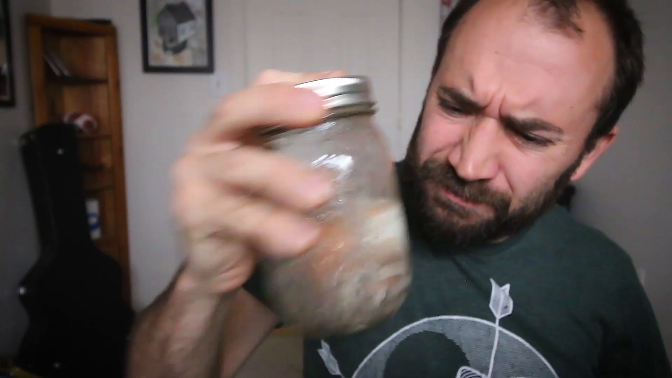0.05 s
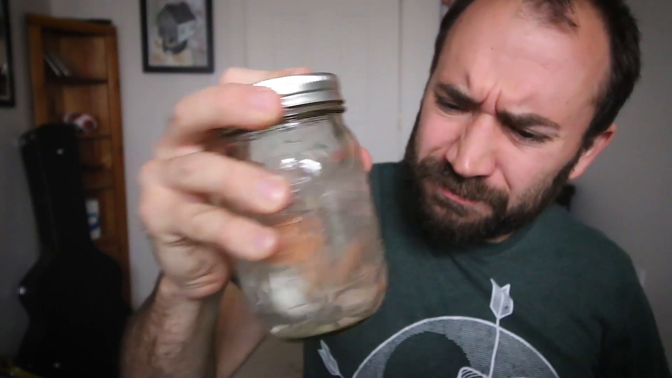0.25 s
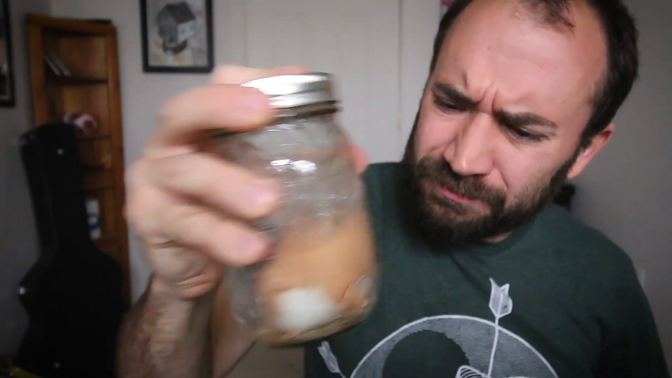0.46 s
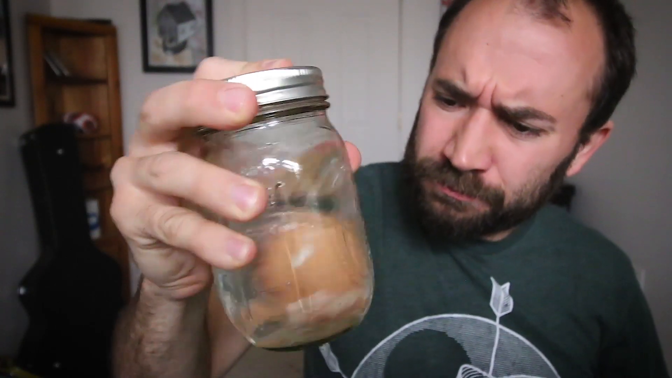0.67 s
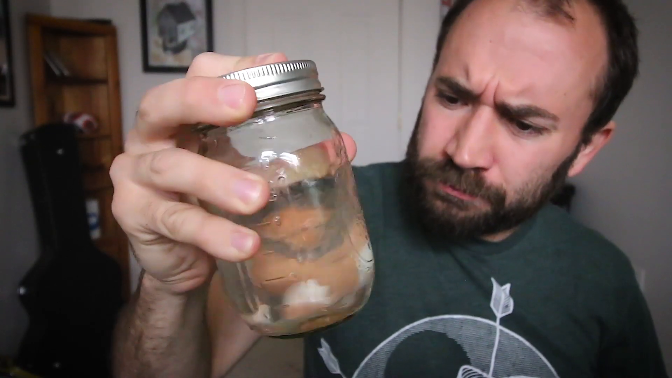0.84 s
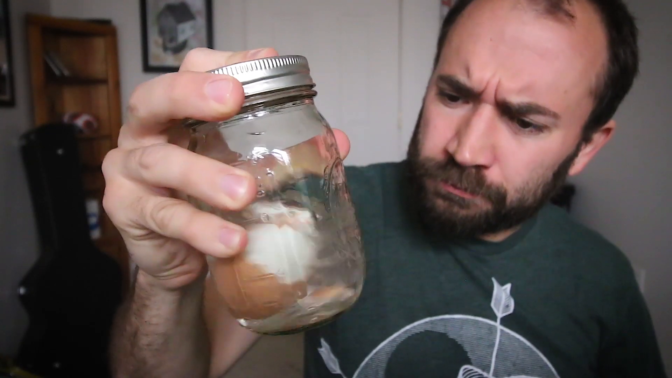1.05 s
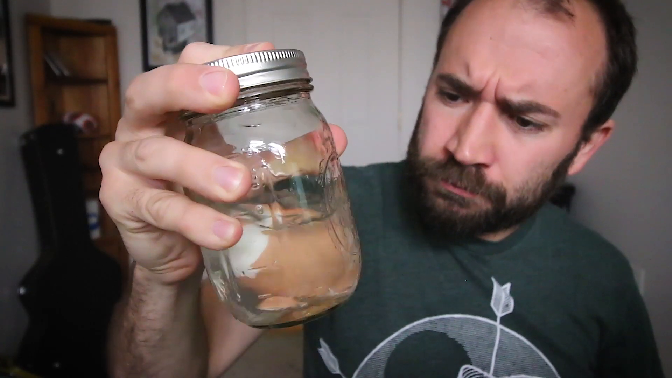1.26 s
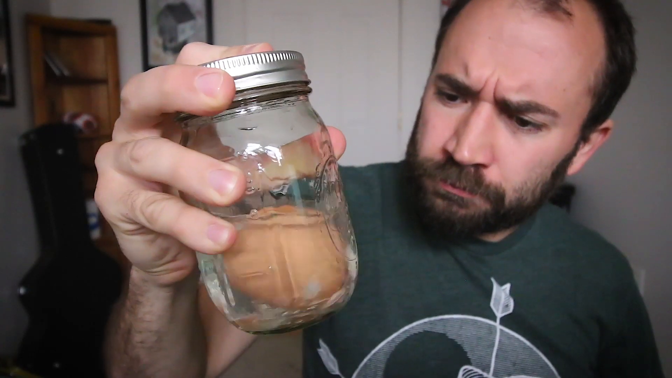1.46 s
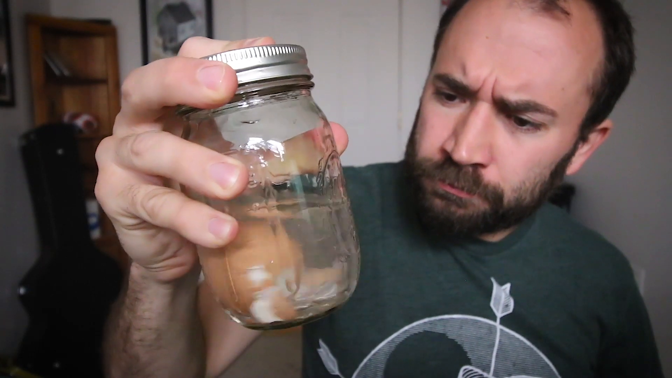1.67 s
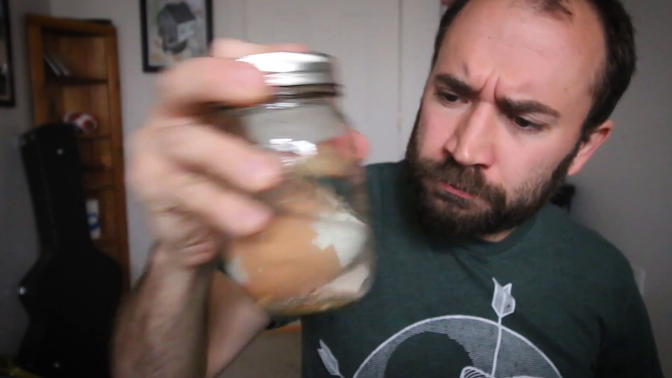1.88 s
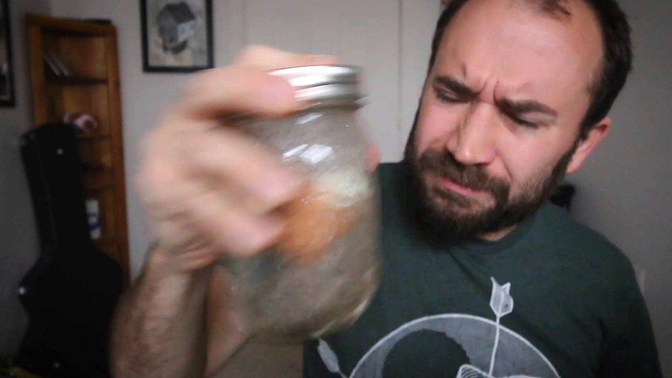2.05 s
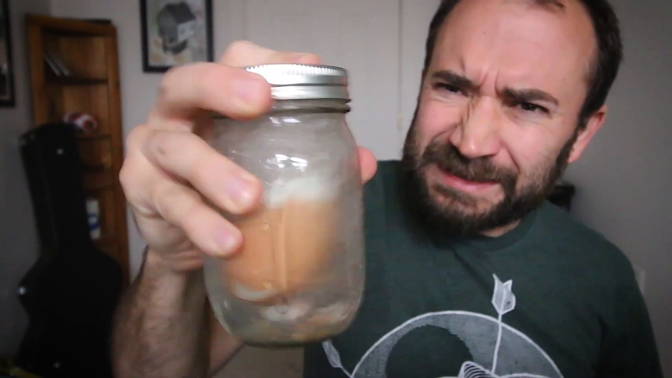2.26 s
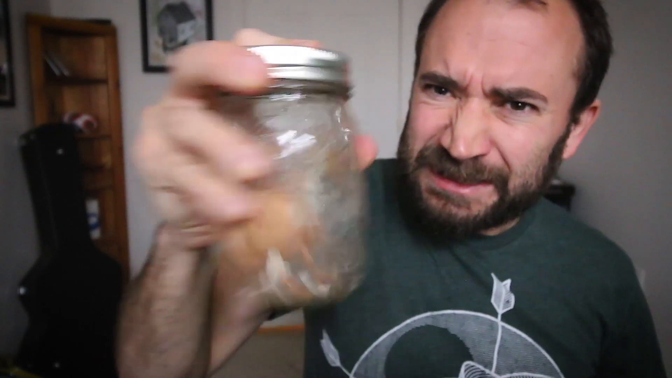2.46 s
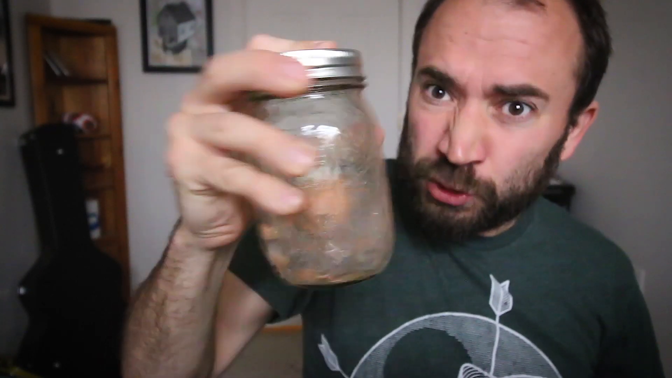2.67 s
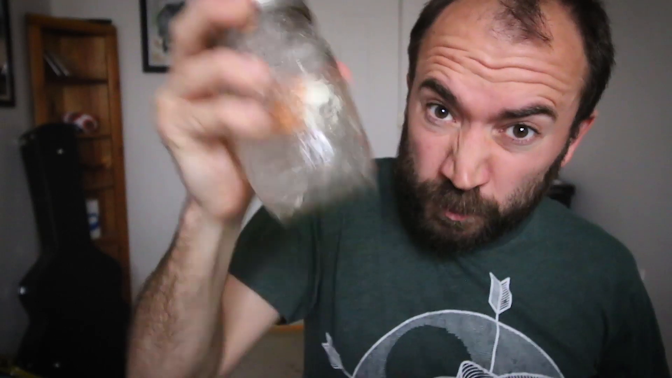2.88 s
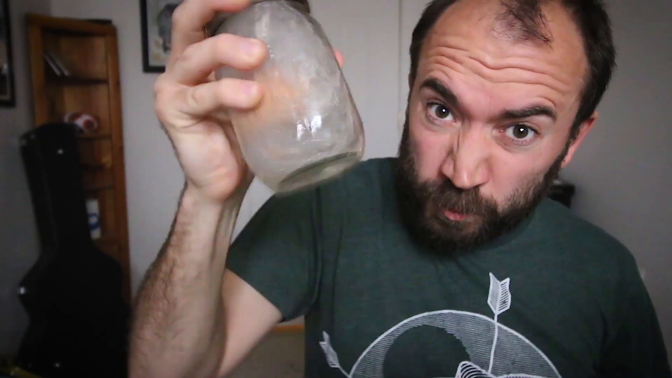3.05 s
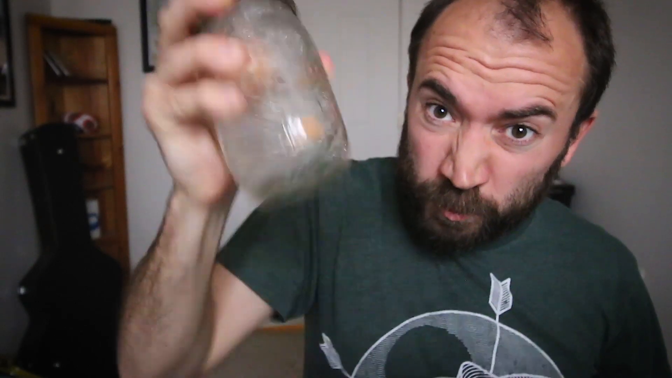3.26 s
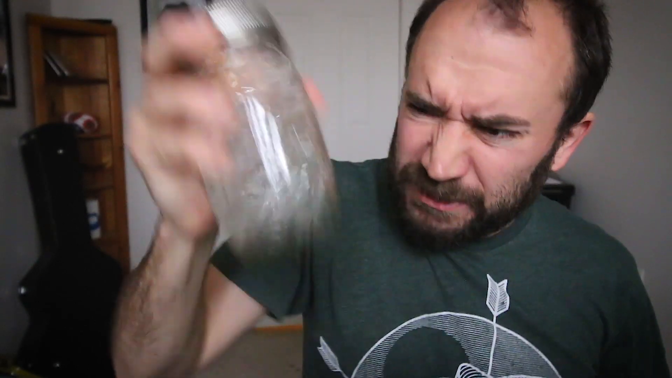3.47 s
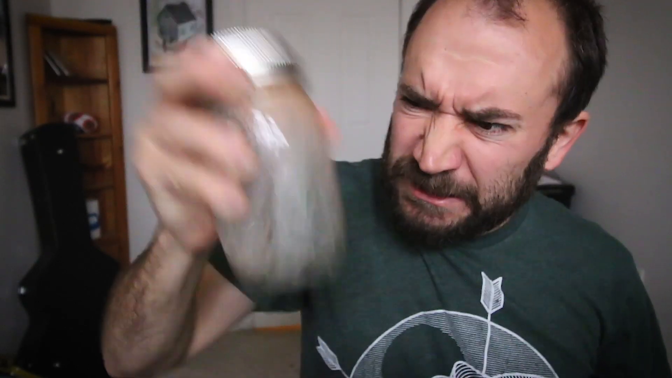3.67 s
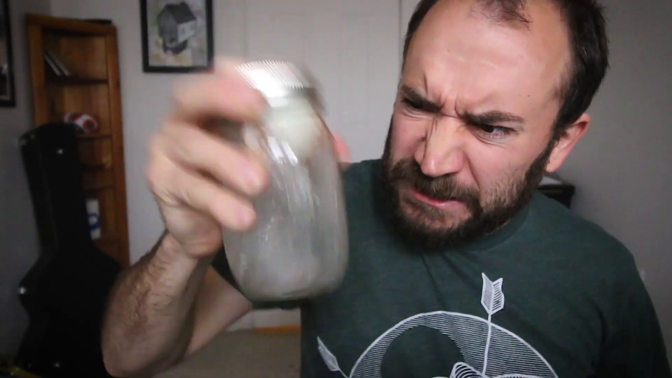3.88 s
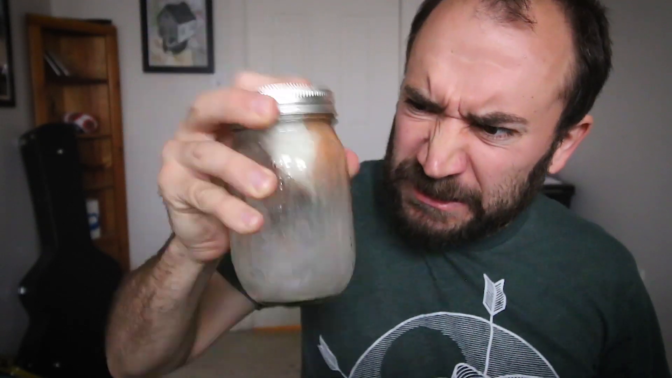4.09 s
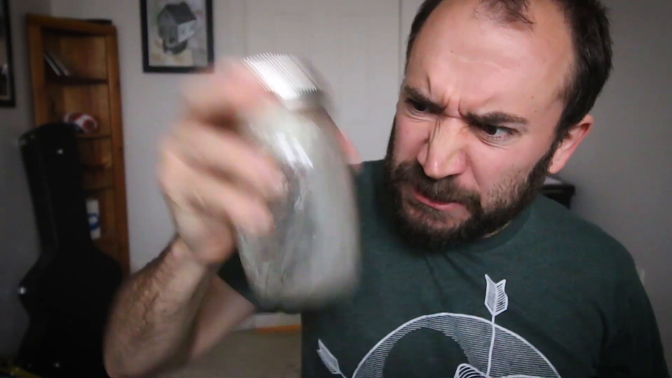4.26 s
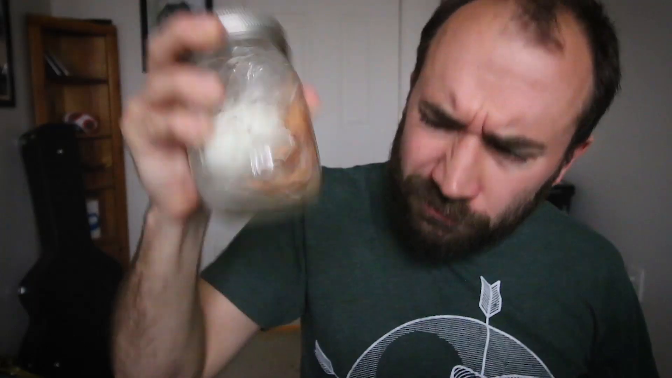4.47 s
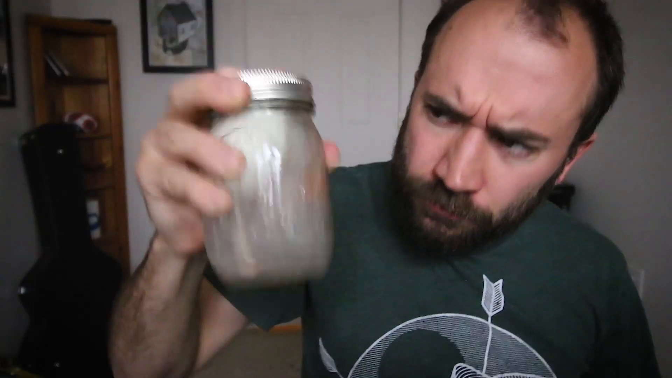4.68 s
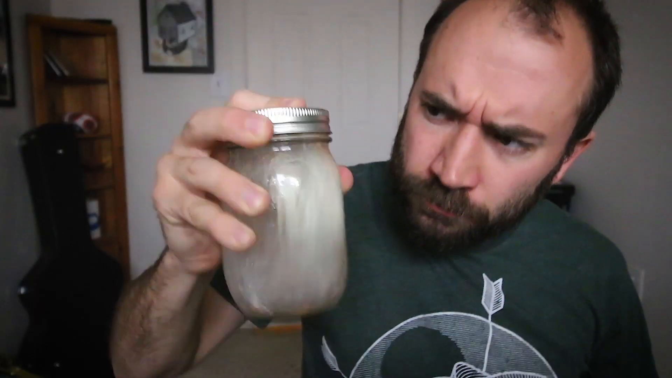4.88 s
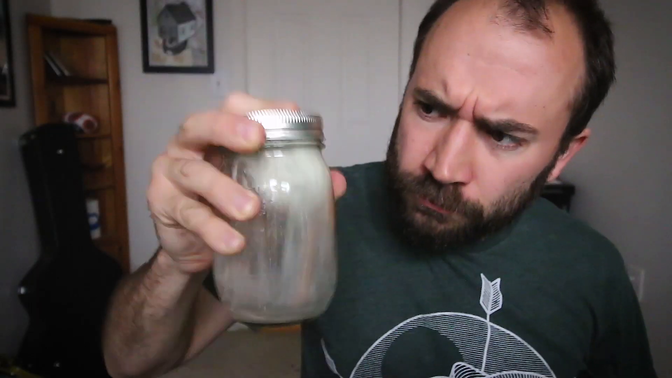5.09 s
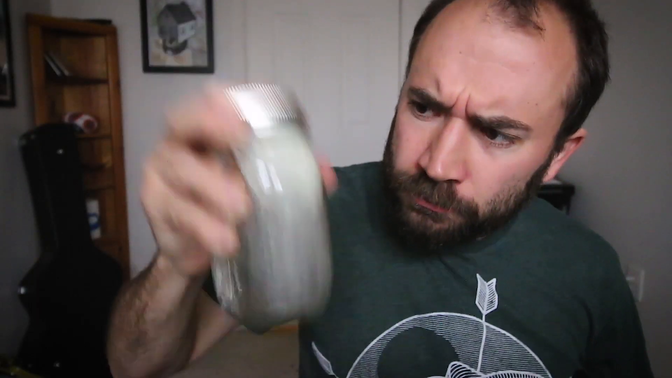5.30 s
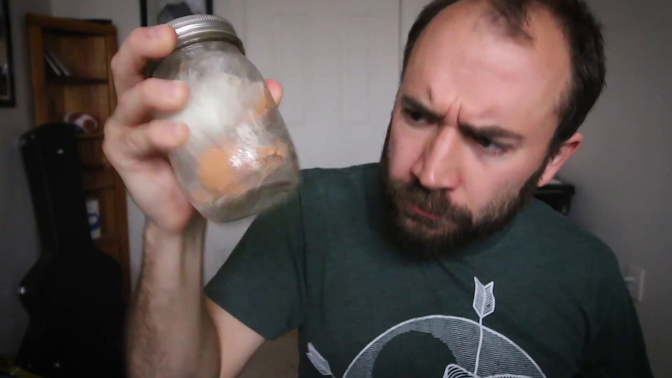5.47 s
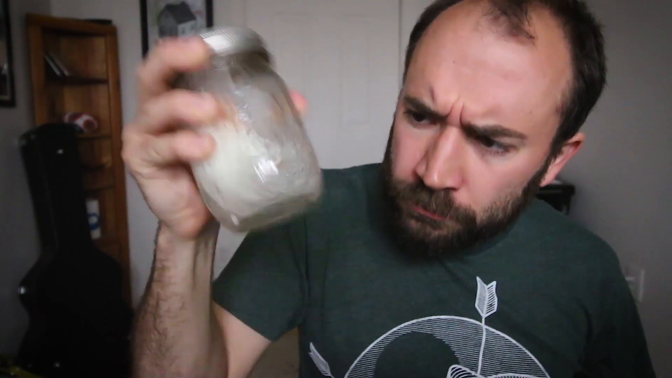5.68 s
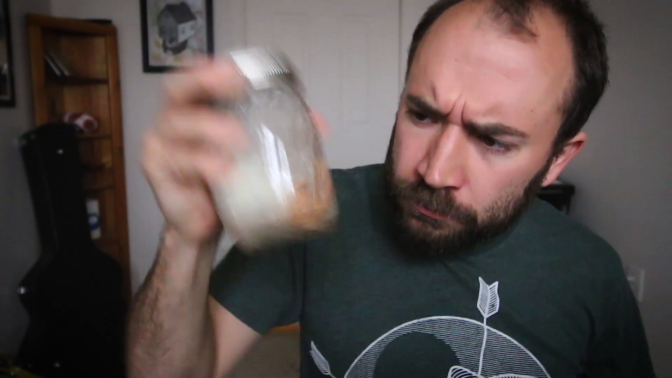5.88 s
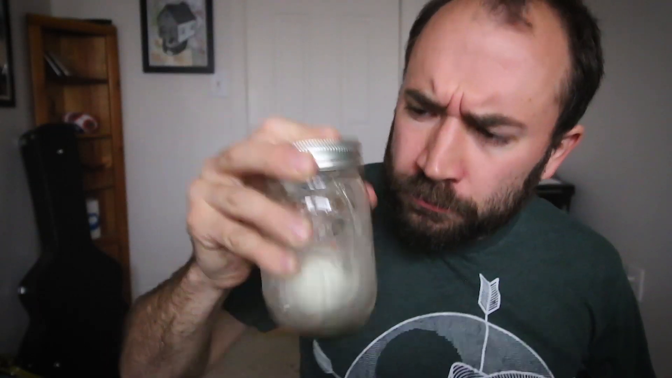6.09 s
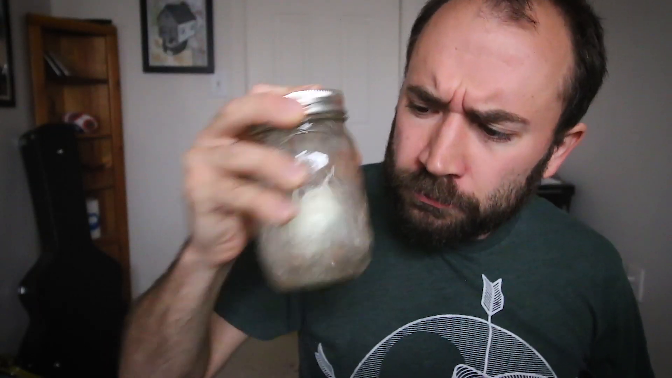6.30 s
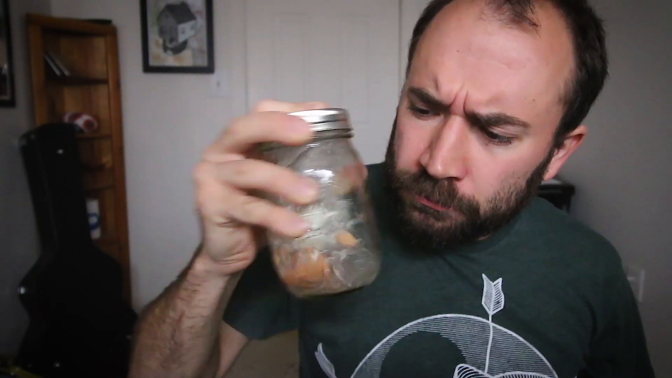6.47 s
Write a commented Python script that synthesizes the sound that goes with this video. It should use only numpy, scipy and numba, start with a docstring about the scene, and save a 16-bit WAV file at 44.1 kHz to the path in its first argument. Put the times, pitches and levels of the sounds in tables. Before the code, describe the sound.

An egg taps and thumps inside a glass jar of water, swirled softly at first and then shaken fast, indoors.

```python
"""Water sloshes around an egg in a lidded glass jar: a few gentle swirls, a pause, then hard shaking.
Each throw of the water traps bubbles, which ring as damped oscillators, the smallest at the highest
pitch. Short pings are the egg tapping the glass in the swirls, and air pockets plopping. Sheets of water
slap the wall, the egg thumps it and chips of shell tick on it. Slaps and thumps excite the brief modes
of the glass, and a small room reverberates."""
import sys
import numpy as np
from scipy import signal
from scipy.fft import rfft, irfft, next_fast_len
from scipy.io import wavfile
from scipy.ndimage import uniform_filter1d
from numba import njit

SR = 44100
rng = np.random.default_rng(int(sys.argv[2]) if len(sys.argv) > 2 else 0)


def wav_out(sig):
    """Save sig, one row per channel (or a flat mono array), as 16-bit PCM at SR to the path in sys.argv[1]."""
    wavfile.write(sys.argv[1], SR, np.round(np.clip(np.atleast_2d(sig).T, -1, 1) * 32767).astype(np.int16))


N = 288308

# hard shaking, one row a throw of the water against the lid or the base: time_s, level_db, length_s
STROKES = [(2.129, -41.5, 0.039), (2.178, -32.5, 0.049), (2.275, -32, 0.037), (2.357, -35.5, 0.057),
           (2.457, -29.5, .022), (2.542, -31, 0.069), (2.609, -27, 0.052), (2.681, -34.5, 0.073),
           (2.73, -31.5, 0.049), (2.783, -32, 0.064), (2.886, -28, 0.039), (2.976, -29, 0.069),
           (3.086, -29.5, 0.039), (3.166, -26.5, 0.054), (3.266, -35.5, 0.1), (3.351, -27, 0.073),
           (3.459, -33.5, 0.048), (3.554, -23.5, .047), (3.654, -34.5, 0.099), (3.73, -24.5, 0.042),
           (3.841, -30.5, 0.046), (3.928, -26, 0.043), (4.035, -29, .034), (4.106, -26, 0.064),
           (4.234, -32, 0.11), (4.33, -25, .03), (4.425, -31.5, 0.057), (4.489, -27, 0.073),
           (4.575, -30, 0.064), (4.682, -33.5, 0.11), (4.797, -30, 0.065), (4.885, -26, 0.038),
           (5.008, -32, 0.06), (5.113, -31, 0.043), (5.236, -31.5, 0.052), (5.314, -33.5, .04),
           (5.34, -26, 0.028), (5.466, -31, 0.058), (5.593, -27.5, 0.04), (5.702, -34, 0.089),
           (5.811, -27.5, 0.047), (5.949, -32, 0.07), (6.048, -27.5, 0.046), (6.119, -34.5, 0.022),
           (6.185, -36, 0.078), (6.389, -41, 0.081), (6.495, -34.5, 0.06)]
USUAL_DB = -30  # a middling stroke
RISE_SHARE = 0.44  # of a surge's length; the rest is its fall
EDGE_HZ = 16050


def slosh():
    """Bubble resonance: large bubbles gurgle, middling ones churn and the smallest hiss as spray."""
    # resonances of the jar: centre_hz, width_hz, gain_db
    jar_resonances = [(277, 10, -4), (420, 45, 2.5), (658, 43, 7.5), (924, 370, 5), (1760, 580, 4.5),
                      (3040, 4500, 1), (9580, 1030, -5.5)]
    _, level_db, _, _, gurgle_db, spray_db, _ = surges()
    gurgle = swarm(67, 446, gurgle_db, per_s=420, cycles=7.1, spread_db=0, glide=0.32,
                   crowd_db=-51, stretch=0.85, lag_s=0.0019)
    churn = swarm(476.6, 5294, level_db, per_s=2200, cycles=19.05, spread_db=13, glide=0.2,
                  crowd_db=-35.5, stretch=0.94, lag_s=0.00037)
    spray = swarm(5210, EDGE_HZ, spray_db, per_s=2400, cycles=18.3, spread_db=20, glide=0.13,
                  crowd_db=-42.5, stretch=1.23, lag_s=-0.00039)
    # droplets land in clumps a few milliseconds long
    flicker = uniform_filter1d(uniform_filter1d(rng.standard_normal(N), size=130), size=60)
    clumps = unit(amp(3.4 * unit(flicker)))
    water = amp(-3) * (gurgle + churn + spray * clumps)
    return colour(water, lambda f: sum(db / (1 + (2 * (f - hz) / width) ** 2)
                                       for hz, width, db in jar_resonances))


def surges():
    """Forced sloshing: each lap or throw is a surge, and a harder throw entrains more air.
    Returns time_s, level_db, rise_s, fall_s, gurgle_db, spray_db, lean_db (towards small bubbles)."""
    # gentle laps of the water: time_s, level_db, length_s, relative_spray_db, lean_db
    swirls = [(.004, -32, 0.026, 1.5, 5.5), (0.029, -37.5, .053, -20, 6), (0.214, -28.5, 0.035, -9.5, 3),
              (0.413, -46.5, .11, -9, 10), (0.493, -38, 0.039, -4.5, 13), (0.628, -45.5, 0.068, -11.5, 5),
              (0.705, -45.5, 0.04, 0, 10), (.735, -43.5, 0.068, -5, 22), (0.784, -40, 0.056, -18, 9)]
    rows = [(s, db, length, db - 14, db + spray, lean) for s, db, length, spray, lean in swirls]
    for s, db, length in STROKES:
        force_db = db - USUAL_DB
        gurgle = USUAL_DB - 8.5 + 0.89 * force_db
        spray = USUAL_DB - 4.5 + 0.45 * force_db
        lean = 0.5 + 0.1 * force_db
        rows.append((s, db, length, gurgle, spray, lean))
    s, db, length, gurgle, spray, lean = np.transpose(rows)
    return s, db, RISE_SHARE * length, (1 - RISE_SHARE) * length, gurgle, spray, lean


def swarm(lo_hz, hi_hz, surge_db, per_s, cycles, spread_db, glide, crowd_db, stretch, lag_s):
    """Incoherent addition: random bubbles share the surges' power, thinning to blips below crowd_db."""
    # spectrum of churning water: frequency_hz, density_db
    water_spectrum = [(29, -32), (50, 5.5), (75, 1), (180, -20.5), (264, -8.5), (559, -3), (630, -9.5),
                      (1300, -0.5), (2210, -7), (2880, 2), (5270, -9.5), (8340, -10), (9410, -12.5),
                      (12300, -13), (16000, -17)]
    s, _, rise, fall, _, _, lean_db = surges()
    draws = np.random.default_rng(rng.integers(2 ** 31))
    when, size, strength, sign, damping, bend, luck = draws.random((int(per_s * N / SR), 7)).T
    hz = lo_hz * (hi_hz / lo_hz) ** size
    # some surges trap large pockets, others break into small ones
    smallness = np.clip(np.log(hz / 1900) / 0.38, -0.6, 0.5)
    tilt = 10 ** (smallness[:, None] * lean_db / 10)
    share = tilt * (amp(read(water_spectrum, hz)) ** 2 * hz)[:, None]
    age = (when[:, None] * N / SR - s - lag_s) / stretch
    from_crest = np.maximum(-age / rise, age / fall)
    surge = np.exp(-2 * np.minimum(from_crest, 20)) * amp(surge_db) ** 2
    power = (surge * share / share.mean(0)).sum(1)
    birth_chance = np.clip(np.sqrt(surge.sum(1)) / amp(crowd_db), 0.05, 1)
    life = cycles * 2 ** (2 * damping - 1) / hz * SR
    # a damped sine of height 1 holds an energy of about life / 19
    gain = np.sqrt(power / birth_chance * SR / per_s * 19 / life) * unit(amp(spread_db * strength))
    gain *= np.sign(sign - 0.5) * (luck < birth_chance)
    starts = (when * (N - 1)).astype(np.int64)
    return ring_out(N, starts, gain, hz, life, glide * (2 * bend - 1), onset=0.14)


def taps_and_plops():
    """Free vibration: short pings of the egg tapping the glass in the swirls and air pockets plopping."""
    # pitched pings, both egg taps and plops: start_s, level_db, pitch_hz
    pings = [(.019, -32.5, 1040), (.036, -28.5, 1720), (.055, -37, 844), (.075, -29, 1900),
             (0.0972, -22.5, 3610), (0.143, -29.5, 5340), (.249, -26.5, 2800), (0.343, -25.5, 2900),
             (.39, -22.5, 4060), (0.429, -33, 3380), (.446, -30.5, 5700), (0.467, -29, 2890),
             (0.486, -28, 7150), (0.499, -28, 1720), (.525, -26, 3960), (0.599, -25, 3850),
             (.616, -22.5, 2850), (.641, -33, 4980), (0.668, -32, 3970), (.695, -33.5, 3720),
             (0.696, -34.5, 1660), (0.728, -35, 2830), (1.226, -40.5, 2200), (1.233, -42.5, 3300),
             (1.244, -41.5, 1270), (2.093, -26.5, 3850), (2.132, -22.5, 2480), (2.182, -17.5, 1416),
             (2.289, -19.5, 3000), (2.437, -26, 1730), (2.453, -27.5, 570), (2.508, -29, 550),
             (2.589, -17.5, 4730), (2.612, -20, 2840), (2.691, -22, 2650), (2.728, -25, 2960),
             (2.817, -20, 2890), (2.889, -22.5, 670), (3.073, -21.5, 2860), (3.152, -15.5, 3320),
             (3.25, -23, 3390), (3.351, -23.5, 1600), (3.466, -18, 1040), (3.553, -22, 1630),
             (3.706, -16, 1150), (3.74, -18, 1330), (3.933, -14.5, 1210), (4.02, -23, 770),
             (4.082, -29.5, 970), (4.291, -21.5, 817), (4.476, -14.5, 970), (4.515, -21.5, 1560),
             (4.831, -23.5, 3080), (4.918, -19.5, 3010), (5.118, -18, 2850), (5.246, -26, 1710),
             (5.305, -25, 606), (5.34, -18.5, 1470), (5.455, -18, 1650), (5.683, -26.5, 1380),
             (5.911, -26, 1820), (6.02, -19, 3330), (6.127, -31.5, 526), (6.308, -26.5, 827)]
    out, t = np.zeros(N), np.arange(2048) / SR
    lead_s = 0.003
    sweep = np.linspace(0, 1, int(2 * lead_s * SR))
    for s, db, hz in pings + stray_pockets():
        t60 = 0.024 * (1000 / hz) ** 0.044  # higher pings die sooner
        add(out, s, amp(db) * damped_sine(hz, t60, glide=0.16, onset=0.91))
        burst = noise(len(t), lambda f: -9 * np.log2((f + 1) / (1.04 * hz)) ** 2)
        add(out, s, amp(db - 15) * burst * t / 0.0015 * np.exp(1 - t / 0.0022))
        # a faint falling chirp leads into each ping
        phase = 2 * np.pi * np.cumsum(hz * (1.5 - 0.5 * sweep)) / SR
        chirp = np.sin(phase) * np.sin(np.pi * sweep) ** 2
        add(out, s - lead_s, amp(db - 31) * chirp)
    return amp(-2) * out


def stray_pockets(lo_hz=535, hi_hz=3220):
    """Air entrainment: each throw traps one more pocket of chance size: start_s, level_db, pitch_hz."""
    rows = []
    for s, db, length in STROKES:
        when, weakness, size = rng.random(3)
        start_s = s + (when - RISE_SHARE) * length
        rows.append((start_s, db + 2.5 - 7.5 * weakness, lo_hz * (hi_hz / lo_hz) ** size))
    return rows


def slaps(t60=0.022, snap_t60=0.0038):
    """Impact noise: the brief contact of water or shell with the wall gives a broad crack and spatter."""
    # blows on the wall: start_s, level_db, centre_hz, relative_spatter_db
    blows = [(.208, -12, 3520, -28), (.368, -24, 3060, -22), (.446, -20, 2960, -26), (.486, -21, 1830, -18),
             (.781, -9.5, 2240, -22), (.795, -19, 1820, -3), (1.206, -34.5, 2210, -16),
             (1.276, -33, 3080, -30), (2.11, -23, 2600, -8), (2.119, -15, 2460, 5), (2.119, -15, 1000, -20),
             (2.181, -10.5, 1320, 5), (2.263, -7.5, 3670, -8), (2.281, -34, 3110, -17),
             (2.358, -15.5, 3050, 5.5), (2.589, -7, 4650, -13), (2.723, -14, 3100, -0.5),
             (2.781, -10, 2940, -23), (3.271, -11, 1500, -10), (3.329, -7.5, 1570, -23),
             (3.467, -10, 990, -4.5), (3.536, -9, 3450, -10), (3.659, -10.5, 1090, -1.5),
             (3.839, -15.5, 1740, -9), (3.919, -18.5, 1300, 7), (4.233, -18.5, 3230, 4.5),
             (4.317, -6, 3360, -29), (5.081, -14, 1560, -17), (5.34, -20, 1480, -24),
             (5.556, -22, 3080, -28), (5.589, -7, 1570, -6.5), (5.802, -12.5, 1600, -1),
             (5.944, -11, 1130, -26), (6.046, -4, 1380, -11), (6.307, -17, 2680, -27),
             (6.361, -17, 3500, -26)]
    out, t = np.zeros(N), np.arange(4096) / SR
    for s, db, hz, spatter_db in blows:
        body = noise(len(t), lambda f: -6 * np.hypot(0.3, np.log2((f + 1) / hz))
                     - 2 * np.log2(1 + f / hz) - 9 * np.maximum(np.log2(0.68 * hz / (f + 1)), 0))
        crack = body * amp(db - 60 * t / t60) * (1 - np.exp(-(t / 0.002) ** 2))
        droplets = amp(spatter_db) * np.linalg.norm(crack) * spatter(len(t), t60, count=16)
        add(out, s - 0.0004, crack + droplets)
        snap = amp(db - 12.5 - 60 * t / snap_t60) * rng.standard_normal(len(t))
        add(out, s + 0.0013, snap)
        # the front of the sheet wets the wall just before the rest lands
        front = body[:512] * amp(db - 15.5) * np.exp(-t[:512] / 0.0021)
        add(out, s - len(front) / SR, front[::-1])
        add(out, s, amp(db - 48) * glass())
    return amp(-7) * out


def thumps(thud_cycles=6.4, hard_blow_s=2.182):
    """Soft impact: the egg's long contact gives a low thud and push; cavity and glass ring faintly."""
    # blows of the egg: start_s, level_db, pitch_hz
    blows = [(.207, -27.5, 98), (.209, -27, 312), (2.182, -19.5, 370), (.785, -43, 94), (2.265, -29.5, 110),
             (2.671, -23.5, 333), (3.184, -25, 302), (3.271, -30, 110), (3.359, -21.5, 366),
             (3.394, -25.5, 265), (3.468, -29, 125), (3.558, -28.5, 251), (3.656, -30, 93),
             (3.745, -15, 272), (3.932, -19.5, 340), (3.966, -25.5, 224), (4.133, -23.5, 325),
             (4.234, -25, 120), (4.323, -20, 255), (4.574, -27.5, 273), (5.602, -27.5, 324),
             (6.051, -30, 370)]
    # modes of the jar's hollow: pitch_hz, relative_db, t60_s
    cavity_modes = [(262.6, -20, 0.24), (379.3, -22, 0.16)]
    out = np.zeros(N)
    push = damped_sine(82, t60=0.03, glide=-0.1, onset=0.42)
    for s, db, hz in blows:
        add(out, s, amp(db) * damped_sine(hz, thud_cycles / hz, glide=-0.12, onset=0.12))
        add(out, s, amp(db - 19.5) * push)
        add(out, s, amp(db - 46) * glass())
        for mode_hz, mode_db, t60 in cavity_modes:
            hollow = damped_sine(mode_hz * rng.uniform(0.96, 1.06), t60, glide=-0.063, onset=1.1)
            add(out, s, amp(db + mode_db) * hollow)
    # the first hard stroke flings the egg against bare glass
    add(out, hard_blow_s, amp(-14.5) * damped_sine(306, t60=0.004, glide=-0.2, onset=0.17))
    add(out, hard_blow_s, amp(-24.5) * push)
    add(out, hard_blow_s, amp(-28.5) * glass())
    return out


def glass():
    """Mode splitting: the struck jar's uneven walls turn each mode into a close pair."""
    # modes of the glass, damped by hand and water: pitch_hz, level_db, t60_s
    modes = [(1600, -5, 0.13), (2850, -9, 0.11), (3315, 14.5, 0.013), (4600, -14, 0.046), (5880, 4, 0.083),
             (5500, -12, 0.052), (6070, -25, 0.063), (6336, -30, 0.088), (7278, -46, 0.03), (7650, -9, .06),
             (11800, -30, .05)]
    t = np.arange(SR // 4) / SR
    ring = np.zeros(len(t))
    for hz, db, t60 in modes + modes:
        cycles = hz * rng.uniform(0.98, 1.025) * t + rng.random()
        ring += amp(db - 60 * t / t60) * np.sin(2 * np.pi * cycles)
    return ring / np.sqrt(2)


def ticks(t60=0.0099):
    """Hard impact: a light chip of shell meets the glass with a bright click, then skips a few times."""
    # chips striking before the hard shaking: start_s, level_db, centre_hz
    chips = [(.004, -19, 11500), (.086, -33, 7600), (0.144, -25, 7000), (.243, -25, 12000),
             (.266, -20.5, 12500), (.368, -24, 7400), (.387, -35, 6950), (.447, -37, 7000),
             (.525, -38, 11000), (0.595, -23, 8200), (.683, -29, 13000), (.741, -23, 7000),
             (0.755, -27, 8200), (1.01, -38, 12000), (1.04, -36, 11000), (2.01, -33.5, 11000),
             (2.101, -26, 8700), (2.11, -27, 11000), (2.143, -18, 9000)]
    out, t = np.zeros(N), np.arange(2048) / SR
    for s, db, hz in chips:
        click = noise(len(t), lambda f: -18 * np.log2((f + 1) / hz) ** 2) * amp(-60 * t / t60)
        skips = amp(-7) * np.linalg.norm(click) * spatter(len(t), t60, count=4)
        add(out, s, amp(db) * (click + skips))
    return amp(-11.5) * out


def spatter(size, t60, count):
    """Secondary impacts: tiny high pings scattered through the decay of a blow; total energy 1."""
    delay, pitch, strength = rng.random((count, 3)).T
    hz = 4200 * (15000 / 4200) ** pitch
    starts = (delay ** 2 * 0.71 * t60 * SR).astype(np.int64)
    gains = amp(8.6 * strength - 5 * pitch)
    pings = ring_out(size, starts, gains, hz, lives=16 * SR / hz, glides=0.12 * delay, onset=0.135)
    return pings / np.linalg.norm(pings)


def shoves():
    """Momentum transfer: the water stops against the jar at every throw and gives it a low push."""
    out = np.zeros(N)
    for s, db, _ in STROKES:
        push = damped_sine(69 * rng.uniform(0.55, 1.37), t60=0.042, glide=-0.2, onset=0.74)
        add(out, s - 0.0062, amp(-42 + 0.21 * (db - USUAL_DB)) * push)
    return out


def drips(count=26, fade_db=4.5):
    """Drainage: water runs off the wall and tiny bubbles burst, ever fewer and fainter."""
    # run-off during and after the swirls: start_s, length_s, level_db
    drains = [(.0, 0.87, -35), (0.792, .36, -36)]
    out = np.zeros(N)
    for s, length, db in drains:
        wait, pitch, weakness = rng.random((count, 3)).T
        hz = 2800 * (12000 / 2800) ** pitch
        starts = ((s + length * wait ** 2) * SR).astype(np.int64)
        gains = amp(db - fade_db * wait - 9 * weakness)
        out += ring_out(N, starts, gains, hz, lives=14 * SR / hz, glides=0.3 * weakness, onset=0.11)
    return out


def room(x, places=6, places_per_s=31):
    """A moving source: the jar's sound crossfades through the impulse responses of several places."""
    position = np.arange(N) / SR * places_per_s
    out = np.zeros(N)
    for k in range(places):
        distance = abs((position - k + places / 2) % places - places / 2)
        weight = np.cos(np.pi / 2 * np.minimum(distance, 1))
        out += signal.oaconvolve(x * weight, echoes())[:N]
    return out


def echoes():
    """Reverberation: a few early reflections and a tail in which each band is absorbed at its own rate."""
    # reverberation time of the room: frequency_hz, t60_s
    decay_times = [(100, 0.73), (500, 0.9), (1500, 0.54), (4000, 0.36), (9000, 0.28), (16000, 0.93)]
    # colour of the tail: frequency_hz, gain_db
    tone = [(100, -18.5), (500, -16), (1600, -7), (2300, -7.5), (3600, -1.5), (6000, -1.5), (12000, -10)]
    taps = np.zeros(SR // 2)
    slots = np.arange(300, len(taps) - 20, 20)
    taps[slots + rng.integers(0, 20, len(slots))] = rng.choice([-1., 1.], len(slots))
    hz, t, bands = signal.stft(taps, SR, nperseg=256)
    decay = amp(-60 * t / read(decay_times, hz)[:, None])
    tail = signal.istft(bands * decay, SR, nperseg=256)[1]
    response = colour(tail / np.linalg.norm(tail), lambda f: read(tone, f))
    for delay_s in rng.uniform(0.002, 0.018, size=5):
        add(response, delay_s, amp([-18]))
    return response


def hush():
    """Ambient noise: the steady, mostly low sound of the still room."""
    # spectrum of the room's noise: frequency_hz, density_db
    spectrum = [(15, -51), (25, -5), (59, -2.5), (92, -17.5), (149, -2.5), (200, -13), (236, -3.5),
                (335, -10), (439, -17.5), (796, -23.5), (1290, -26.5), (1440, -21.5), (2160, -31),
                (14400, -41), (16000, -41)]
    return amp(-54.5) * noise(N, lambda f: read(spectrum, f))


def damped_sine(hz, t60, glide, onset):
    """A damped oscillator whose pitch glides; its envelope swells over `onset` cycles and peaks at 1."""
    t = np.arange(int(t60 * SR) + 8) / SR
    envelope = (1 - np.exp(-(t * hz / onset) ** 2)) * amp(-60 * t / t60)
    return envelope / envelope.max() * np.sin(2 * np.pi * hz * (t + glide * t ** 2 / (2 * t60)))


@njit
def ring_out(size, starts, gains, hz, lives, glides, onset):
    """Superposition of gliding damped sines; starts and lives in samples, onset as a share of a life."""
    out = np.zeros(size)
    steps = 2 * np.pi * hz / SR
    for k in range(len(starts)):
        for i in range(min(int(lives[k]), size - starts[k])):
            age = i / lives[k]
            envelope = (age / onset) ** 2 if age < onset else np.exp(-6.9 * (age - onset))
            out[starts[k] + i] += gains[k] * envelope * np.sin(steps[k] * i * (1 + glides[k] * age / 2))
    return out


def colour(x, curve_db):
    """Filters x by a function from Hz to dB."""
    size = next_fast_len(len(x) + 2048)
    gain = amp(curve_db(np.fft.rfftfreq(size, 1 / SR)))
    return irfft(rfft(x, size) * gain, size)[:len(x)]


def noise(size, curve_db):
    """Spectrally shaped noise with an rms of 1."""
    return unit(colour(rng.standard_normal(size), curve_db))


def amp(db):
    """Decibels to gain."""
    return 10 ** (np.asarray(db) / 20)


def unit(x):
    """Scales to an rms of 1."""
    return x / np.sqrt(np.mean(x ** 2) + 1e-20)


def read(points, hz):
    """Interpolates a table on a log-frequency axis."""
    f, value = np.transpose(points)
    return np.interp(np.log(hz + 1), np.log(f + 1), value)


def add(mix, s, sound):
    """Mixes a sound in at time s."""
    part = mix[max(round(s * SR), 0):][:len(sound)]
    part += sound[:len(part)]


def scene():
    """Superposition: the jar's direct sound, its reverberation and the noise of the room."""
    jar = slosh() + taps_and_plops() + slaps() + thumps() + ticks() + shoves() + drips()
    return (jar + room(jar) + hush())[None]


def record(dry):
    """Band limiting: the microphone loses the deepest bass, and a steep low-pass cuts the top treble."""
    highpass = signal.butter(2, 38.7, "highpass", fs=SR, output="sos")
    lowpass = signal.firwin(511, EDGE_HZ, window=("kaiser", 9), fs=SR)
    return signal.oaconvolve(signal.sosfilt(highpass, dry), lowpass[None], "same")


dry = scene()
out = record(dry)
wav_out(out)
```